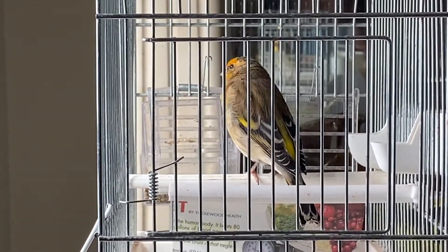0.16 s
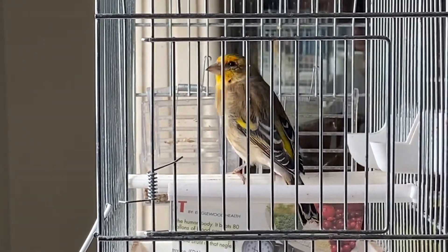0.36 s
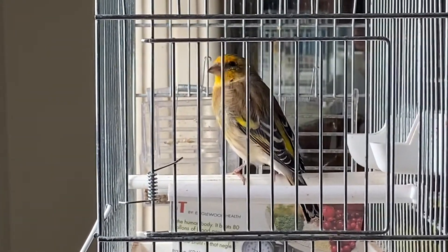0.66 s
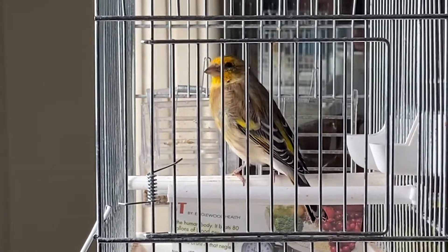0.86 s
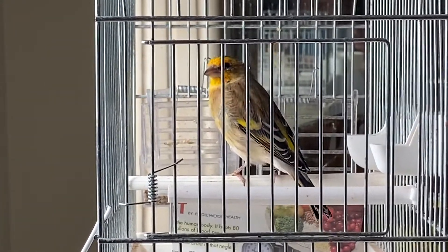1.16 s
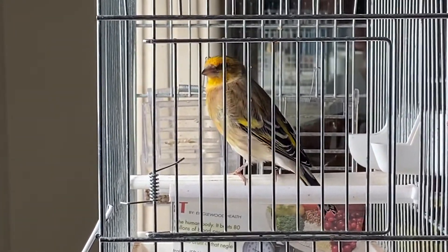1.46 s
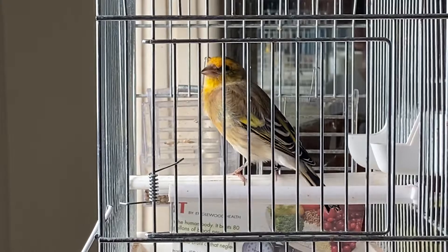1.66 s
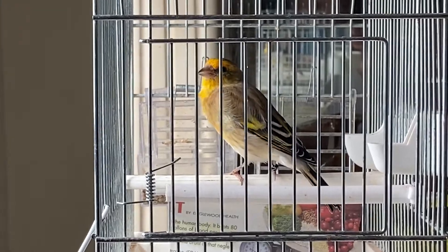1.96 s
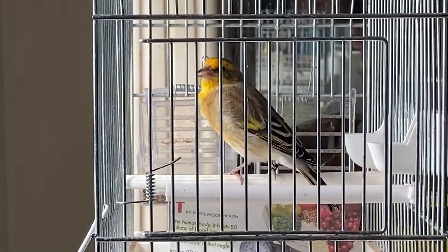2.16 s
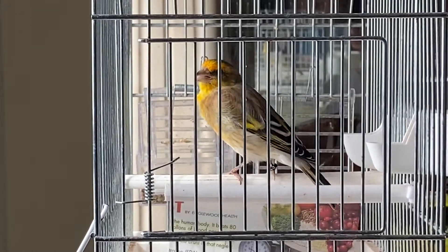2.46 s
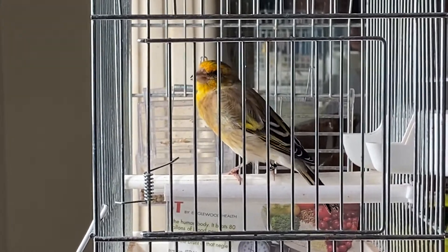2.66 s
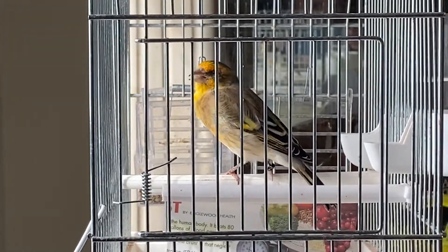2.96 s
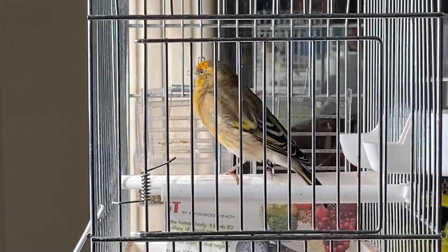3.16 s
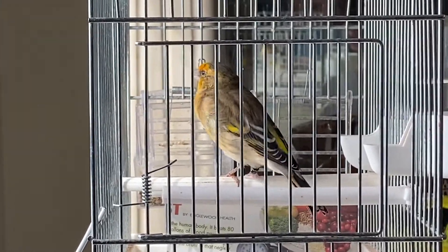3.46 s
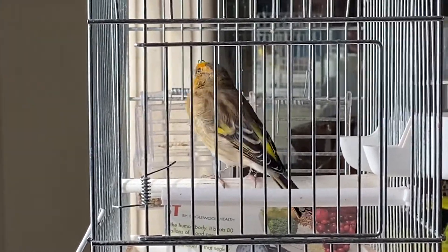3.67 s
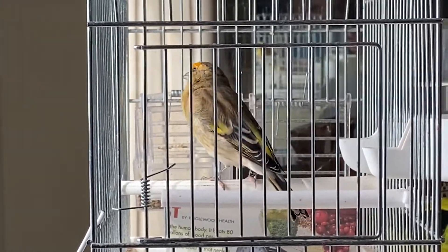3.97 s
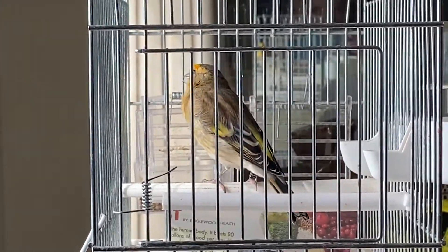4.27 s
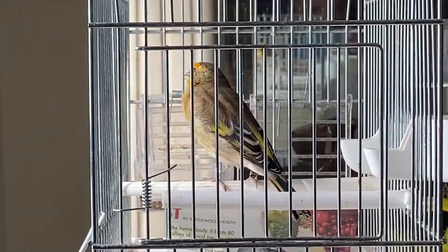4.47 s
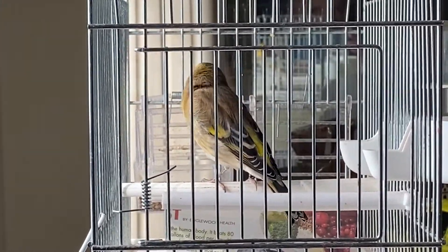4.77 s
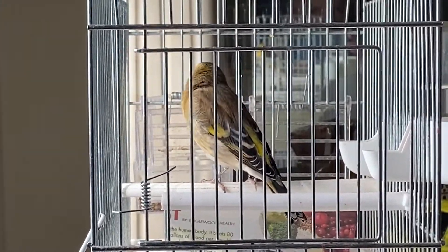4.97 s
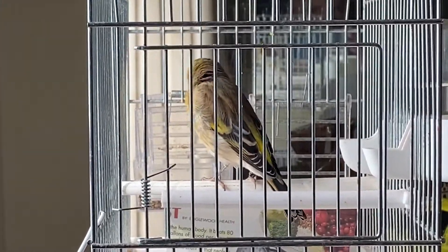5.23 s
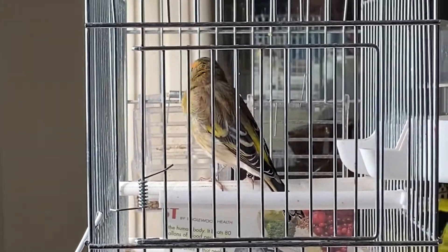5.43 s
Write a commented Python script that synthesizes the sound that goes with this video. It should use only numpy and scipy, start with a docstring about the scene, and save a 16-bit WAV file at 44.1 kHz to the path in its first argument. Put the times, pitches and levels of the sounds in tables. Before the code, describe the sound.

After a quiet second and a half with faint distant bird trills, a nearby finch sings rapid chirps and warbles that ring indoors.

```python
"""A small finch on a perch in a wire cage sings a fast twittering song indoors, close to the microphone.
Both sides of its voice organ, the syrinx, whistle gliding notes with weak overtones and hissing air.
The hard room rings after each note, and late in the song a foot scuffs the perch.
A noise hum of ventilation with a few thin whines lies beneath; before the song, another bird
trills far off as tones of trembling pitch."""
import sys
import numpy as np
from scipy import signal
from scipy.io import wavfile
from scipy.ndimage import uniform_filter1d

SR = 44100
rng = np.random.default_rng(int(sys.argv[2]) if len(sys.argv) > 2 else 0)


def to_linear_factor(level_db):
    """Convert decibel levels (scalar or array-like) to linear amplitude factors."""
    exponent = np.asarray(level_db, float) / 20
    return 10 ** exponent


def dump(signal):
    """Clip the signal to [-1, 1] and save it as 16-bit WAV at the path in sys.argv[1]."""
    limited = np.clip(np.atleast_2d(signal).T, -1, 1)
    pcm = np.round(limited * 32767).astype(np.int16)
    wavfile.write(sys.argv[1], SR, pcm)


N = 246959  # length of the scene in samples

# How the bird holds its head and how rough its voice is:
# (time [s], beak towards the microphone [0-1], rasp [share of the pitch])
FACING = [(3.1, 0.81, 0.0053), (4.5, 0.63, 0.014), (5.3, 0.61, 0.019)]
ALONG = np.linspace(0, 1, 33)  # points along a note, from its start (0) to its end (1)


def evened(x):
    """Scales a sound to an average strength (rms) of 1."""
    return x / np.sqrt(np.mean(x ** 2) + 1e-20)


def read(points, hz):
    """Reads a (frequency, value) table between its rows, on a log-frequency axis."""
    f, value = np.transpose(points)
    return np.interp(np.log(hz + 1), np.log(f + 1), value)


def add(mix, s, sound):
    """Mixes a sound in at time s."""
    part = mix[round(s * SR):][:len(sound)]
    part += sound[:len(part)]


def wobble(size, rate_hz):
    """Smooth random wandering of rms 1: noise with everything much faster than rate_hz removed."""
    settle = 400  # samples thrown away while the filter starts up
    noise = rng.standard_normal(size + settle)
    return evened(signal.lfilter(*signal.butter(N=2, Wn=rate_hz, fs=SR), noise)[settle:])


def hum():
    """Broad ventilation noise in stereo, the deep bass near the middle, with faintly drifting patches."""
    # colour of the noise: (frequency [Hz], relative level per Hz [dB])
    colour = [(18, -52), (30, -5.5), (64, -2), (98, -7.5), (239, -13), (632, -24), (1910, -35),
              (2350, -33.5), (3490, -42), (5450, -46.5), (16000, -69)]
    # how alike left and right are: (frequency [Hz], likeness [-1 to 1])
    likeness = [(60, 1), (240, 0.69), (950, 0.17), (3770, 1), (15000, 0.077)]
    # stereo balance: (frequency [Hz], left over right [dB])
    balance = [(60, 0.5), (200, 4), (1400, -0.5)]
    frames, hz = N // 512 + 5, np.fft.rfftfreq(2048, 1 / SR)
    a, b, c, d, patches = rng.standard_normal((frames, 1025, 5)).T
    patches = uniform_filter1d(patches, size=12, axis=0)  # smooth over frequency
    patches = evened(uniform_filter1d(patches, size=8, axis=1))  # smooth over time
    same = np.clip(read(likeness, hz), -1, 1)[:, None]
    first, second = a + 1j * b, c + 1j * d
    left = first * to_linear_factor(read(balance, hz))[:, None]
    right = same * first + np.sqrt(1 - same ** 2) * second
    spectrum = np.array([left, right]) * to_linear_factor(read(colour, hz)[:, None] + 1.7 * patches)
    noise = signal.istft(spectrum, nperseg=2048, noverlap=1536)[1][:, :N]
    return to_linear_factor(-54.5) * evened(noise)


def whines(steady=1.0):
    """Thin motor and duct whines: each a steady tone inside a narrow band of noise."""
    # one row a whine: (level [dB], reach of the noise either side of the tone [Hz])
    lines = [(-58.5, 21), (-67, 28.5), (-78.5, 11.4), (-82.5, 6.7), (-80.5, 42), (-87, 6.9), (-93, 12)]
    # pitch of each whine, in the same order [Hz]
    line_hz = [59, 230, 590, 1114, 2347, 3230, 5281]
    out = np.zeros(N)
    for hz, (db, width) in zip(line_hz, lines):
        turn = 2 * np.pi * hz * np.arange(N) / SR
        tone = (steady + wobble(N, width)) * np.sin(turn)
        out += to_linear_factor(db) * (tone + wobble(N, width) * np.cos(turn))
    return out


def far_bird():
    """Trills from another room: tones whose pitch trembles fast and at random."""
    # one row a trill: (start [s], pitch [Hz], length [s], level [dB])
    trills = [(0.125, 6300, .16, -87), (0.84, 3950, 0.22, -73.5), (1.006, 5200, 0.19, -75),
              (1.154, 4570, 0.21, -75.5)]
    out = np.zeros(N)
    for s, hz, length, db in trills:
        size = round(length * SR)
        turn = 2 * np.pi * np.cumsum(hz * (1 + 0.085 * wobble(size, 220))) / SR
        add(out, s, to_linear_factor(db) * np.sin(turn) * np.hanning(size))
    return out


def note(rows, fade_s=0.002, flutter_db=3.0, waver=0.004):
    """One side of the syrinx: a gliding near-sine with weak overtones and an unsteady airflow."""
    # overtones of the whistle: (multiple of its pitch, level against the whistle [dB])
    series = [(2, -18.5), (3, -24.5)]
    s, hz, db = np.transpose(rows)
    t = np.arange(s[0] - fade_s, s[-1] + fade_s, 1 / SR)
    rasp = np.interp(t, *np.transpose(FACING)[::2])
    glide_hz = uniform_filter1d(np.interp(t, s, hz), size=60)
    pitch = glide_hz * (1 + waver * wobble(len(t), 220) + rasp * wobble(len(t), 710))
    # "edge" rises over twice fade_s and falls the same way at the end
    edge = np.clip(np.minimum(t - t[0], t[-1] - t) / (2 * fade_s), 0, 1)
    flutter = flutter_db * wobble(len(t), 89)
    level = to_linear_factor(np.interp(t, s, db) + flutter) * np.sin(np.pi / 2 * edge) ** 2
    turn = 2 * np.pi * np.cumsum(pitch) / SR
    # overtones too high for the sample rate are left out
    overtones = sum(to_linear_factor(d) * np.sin(k * turn) * (k * pitch < SR / 2) for k, d in series)
    layers = np.array([np.sqrt(2) * np.sin(turn), np.sqrt(2) * overtones, edge])
    return t[0], (level * layers).T


def glide(start, length, from_hz, to_hz, db, peak):
    """A straight slide in pitch that swells to its peak and fades after it."""
    swell_db, fade_db = -16.5, -14  # level change over a whole note's length, before and after the peak
    shape_db = swell_db * np.maximum(peak - ALONG, 0) + fade_db * np.maximum(ALONG - peak, 0)
    return np.transpose([start + ALONG * length, from_hz + (to_hz - from_hz) * ALONG, db + shape_db])


def chirp(start, length, from_hz, knee_hz, to_hz, db):
    """Pitch relaxes like a released spring, then sags; the note bursts in and is loudest mid-range."""
    # loudness of a chirp by its pitch: (pitch [Hz], level change [dB])
    reach = [(1700, -24.5), (2400, -21.5), (3400, -2.5), (4600, 0), (5600, -3), (7500, -13.5)]
    plunge_s = 0.0035  # time constant of the plunge
    burst_s, burst_db, spent_db = 0.0031, -8.5, -4.5  # onset time and depth; fade by the end
    age = ALONG * length
    sag = (to_hz - knee_hz) * ALONG
    hz = knee_hz + sag + (from_hz - knee_hz) * np.exp(-age / plunge_s)
    onset_db = burst_db * np.clip(1 - age / burst_s, 0, 1)
    return np.transpose([start + age, hz, db + onset_db + spent_db * ALONG + read(reach, hz)])


def throb(start, length, from_hz, to_hz, db, per_s):
    """A sliding whistle blown in quick puffs."""
    dip_db = -16  # depth of the dips between puffs
    shape_db = dip_db * np.cos(np.pi * per_s * ALONG * length) ** 2
    return np.transpose([start + ALONG * length, from_hz + (to_hz - from_hz) * ALONG, db + shape_db])


def finch(square=0.295):
    """All notes; two sounding together mix in the windpipe into sum tones; air hisses with the effort."""
    # warbles that bend up and down, one list a warble: (time [s], pitch [Hz], level [dB])
    warbles = [
        [(1.529, 3050, -37), (1.534, 2985, -42.5), (1.543, 5440, -36), (1.549, 4830, -27), (1.557, 4370, -23.5),
         (1.566, 4776, -23.5), (1.577, 4720, -22)],
        [(1.602, 5380, -22.5), (1.607, 6800, -40.5), (1.618, 6100, -35), (1.626, 5000, -27),
         (1.635, 3870, -20.5), (1.653, 3610, -24)],
        [(1.716, 5000, -27.5), (1.735, 5090, -23.5), (1.742, 5090, -20.5), (1.748, 4420, -20.5),
         (1.756, 5060, -22)],
        [(1.831, 7000, -37), (1.836, 7400, -44), (1.846, 7470, -42.5), (1.861, 5780, -22.5), (1.876, 5650, -24)],
        [(1.949, 4700, -30), (1.97, 4690, -22), (1.979, 4250, -21), (1.982, 4100, -29.5), (1.992, 3574, -15),
         (2.0, 3274, -23.5)],
        [(2.313, 3750, -19.5), (2.328, 3310, -20), (2.345, 2040, -44)],
        [(2.663, 3020, -42), (2.681, 2130, -44.5), (2.691, 2630, -32), (2.698, 2446, -32.5)],
        [(2.726, 5020, -35), (2.738, 3660, -30.5), (2.743, 4440, -32), (2.748, 4470, -48)],
        [(2.853, 4850, -28), (2.859, 4370, -22.5), (2.864, 4860, -21), (2.872, 5100, -21)],
        [(2.941, 7770, -48), (2.95, 4990, -24.5), (2.958, 4680, -18.5), (2.97, 4450, -24), (2.982, 4430, -14.5),
         (2.988, 4330, -39)],
        [(3.406, 7000, -37.5), (3.42, 6220, -29.5), (3.427, 5620, -16), (3.436, 5400, -25.5)],
        [(3.722, 3900, -49), (3.73, 5840, -30.5), (3.742, 5290, -17.5), (3.748, 6050, -38), (3.761, 7180, -27)],
        [(3.846, 2970, -27), (3.852, 3120, -33), (3.861, 4800, -22.5), (3.868, 5050, -28)],
        [(3.96, 2700, -28), (3.971, 3810, -25.5), (3.98, 5130, -22), (3.992, 5190, -47)],
        [(4.068, 3016, -26.5), (4.076, 6750, -37), (4.083, 3860, -24)],
        [(4.239, 4520, -43), (4.243, 5520, -34), (4.254, 7040, -29), (4.261, 7680, -30), (4.265, 6830, -18),
         (4.273, 5120, -23), (4.287, 3680, -35.5)],
        [(4.351, 5660, -28), (4.355, 5640, -20.5), (4.359, 5310, -29), (4.364, 4050, -24.5), (4.376, 6320, -31),
         (4.381, 6500, -30), (4.39, 6100, -17)],
        [(4.404, 4345, -31), (4.412, 4490, -32), (4.418, 4960, -23), (4.426, 5720, -29), (4.434, 5310, -21.5),
         (4.444, 3150, -28), (4.457, 1970, -47)],
        [(4.508, 5230, -24.5), (4.518, 3854, -22), (4.523, 3200, -40)],
        [(4.588, 4150, -24), (4.597, 5270, -35), (4.602, 4500, -46)],
        [(4.613, 5310, -28), (4.638, 4280, -49), (4.648, 4020, -36.5), (4.664, 3560, -32), (4.669, 3400, -56),
         (4.683, 3370, -23), (4.694, 3374, -31), (4.712, 3260, -35)],
        [(4.828, 3300, -42), (4.838, 2950, -42), (4.848, 3200, -36), (4.872, 2500, -41), (4.892, 2534, -29.5)],
        [(4.971, 3720, -36), (4.981, 4146, -24.5), (5.001, 3950, -36)],
        [(5.01, 5110, -28.5), (5.022, 5240, -24.5), (5.027, 5850, -26.5), (5.04, 5080, -41)],
        [(4.99, 2650, -47), (5.03, 2870, -42.5), (5.057, 2807, -41.5), (5.08, 2715, -26), (5.095, 2440, -38),
         (5.122, 2180, -55)],
        [(5.36, 3970, -31), (5.372, 4570, -29), (5.389, 4960, -32), (5.414, 4270, -28)],
        [(5.568, 4770, -35), (5.582, 3800, -21.5), (5.599, 3570, -20.5)],
        [(5.53, 2750, -47.5), (5.544, 4190, -29), (5.551, 4040, -31), (5.569, 4970, -22), (5.577, 5020, -27),
         (5.58, 4200, -44)],
    ]
    # straight whistles: (start [s], length [s], from [Hz], to [Hz], peak level [dB], place of the peak [0-1])
    glides = [ (1.875, .03, 4980, 4732, -18, 0.85), (2.076, 0.0099, 5740, 7350, -31, .9),
              (2.296, 0.012, 3450, 5820, -20, 0.1), (2.337, 0.03, 4260, 4550, -31, 0.73),
              (2.561, 0.0075, 5960, 3450, -22.5, .45), (2.692, 0.017, 5160, 4670, -34, 0.3),
              (2.701, 0.012, 3280, 3380, -28, 0.67), (2.74, 0.0076, 3340, 3620, -27, 0),
              (2.852, 0.0093, 6100, 5000, -20.5, 0.5), (3.169, 0.016, 4004, 3360, -28.5, 0.75),
              (3.273, 0.016, 6180, 6810, -23.5, 1), (3.018, 0.019, 7100, 5180, -20, 0.9),
              (3.416, 0.019, 4590, 4880, -20.5, 0.76), (3.529, 0.022, 6900, 5880, -16.5, 1),
              (3.55, 0.021, 4580, 4700, -25, 0.35), (3.523, 0.0076, 6700, 6860, -26, .55),
              (3.836, 0.0078, 4800, 4550, -29, 0.5), (3.84, 0.017, 4650, 6700, -36.5, 0.56),
              (3.606, 0.01, 7200, 7050, -23, .6), (3.946, 0.0066, 3060, 5250, -26.5, 0),
              (4.152, 0.021, 3860, 4620, -20.5, 0.43), (4.164, 0.033, 6390, 5930, -33.5, 0.07),
              (4.498, 0.0069, 5450, 3333, -17.5, 0.53), (4.815, .008, 3710, 3900, -32, 0.86),
              (4.824, 0.032, 3965, 4270, -24.5, 0.49), (4.897, 0.0082, 2310, 1820, -42.5, 0.7),
              (4.965, 0.023, 3293, 3407, -25, 0.53), (5.003, 0.012, 5600, 5540, -33, 1),
              (5.044, 0.018, 5000, 3520, -31.5, 0.14), (4.082, .009, 3014, 3420, -27.5, 0.86),
              (5.219, 0.047, 2610, 2246, -42, 0.36), (5.227, 0.024, 3390, 3234, -33, 0.8),
              (5.253, 0.029, 4800, 5110, -38.5, 0.7), (5.275, 0.023, 2563, 2194, -37.5, 0),
              (5.319, 0.036, 2667, 1826, -40, 0.26), (5.322, 0.035, 4700, 3730, -31, 0.78),
              (5.361, 0.0063, 3270, 2580, -29, 0), (5.36, .008, 5960, 5230, -30.5, .9),
              (5.4, 0.021, 3120, 2960, -41.5, 0.5), (5.421, .024, 5660, 4875, -19.5, 1),
              (5.229, .026, 5860, 5400, -53, 0.7), (5.276, 0.0061, 4290, 6070, -32.5, 0.7),
              (5.415, 0.0056, 4280, 5830, -39, 0.4), (2.678, 0.013, 3300, 4970, -39, 0), ]
    # chirps, a plunge to a knee and a slower sag:
    # (start [s], length [s], from [Hz], knee [Hz], to [Hz], level before shaping [dB])
    chirps = [ (2.087, 0.036, 7210, 4300, 3013, -20), (2.143, 0.021, 6305, 4190, 2520, -16),
              (2.181, 0.025, 6790, 4090, 2524, -19), (2.221, 0.019, 7090, 3864, 3480, -17.5),
              (2.38, 0.03, 5460, 3506, 2370, -20), (2.427, 0.025, 6310, 3560, 2350, -16.5),
              (2.47, 0.026, 6080, 3450, 2460, -17), (2.514, 0.019, 6510, 4015, 3365, -16),
              (2.567, 0.013, 7000, 5730, 5170, -22.5), (2.737, .009, 7290, 5400, 4110, -16.5),
              (2.794, 0.027, 6395, 3570, 1630, -16), (2.803, 0.021, 6530, 4400, 3560, -24),
              (2.822, 0.013, 4950, 4000, 3600, -29), (2.938, 0.022, 6020, 3220, 2040, -21),
              (3.016, .022, 7030, 5050, 4690, -19.5), (3.016, 0.0082, 8800, 7600, 7140, -17),
              (3.118, 0.023, 6270, 5240, 4260, -21.5), (3.119, .015, 5480, 4240, 3360, -23.5),
              (3.177, 0.016, 7840, 5850, 4720, -18), (3.288, 0.008, 5940, 4840, 3860, -24.5),
              (4.087, 0.027, 6380, 5250, 4810, -29), (5.278, 0.027, 5920, 4460, 3880, -38), ]
    # throbbing whistles: (start [s], length [s], from [Hz], to [Hz], peak level [dB], throbs [per s])
    throbs = [(3.295, 0.016, 5880, 4810, -16, 113), (3.476, .04, 7150, 6210, -15, 70.6),
              (3.613, .045, 7130, 6046, -16, 70.7)]
    # air hissing past the syrinx: (frequency [Hz], level [dB])
    air = [(1500, -55), (6000, -16), (9000, -24), (16000, -26.5)]
    # colour the throat gives to overtones and sum tones: (frequency [Hz], level change [dB])
    throat = [(4000, 19.5), (6800, -6), (8300, -6.5), (11000, -0.5)]
    voice = np.zeros((N + SR // 10, 3))
    song = [chirp(*r) for r in chirps] + [glide(*r) for r in glides] + [throb(*r) for r in throbs] + warbles
    for rows in song:
        add(voice, *note(rows))
    tone, overtones, effort = voice.T
    hz = np.fft.rfftfreq(len(tone), 1 / SR)
    # squaring the tone makes sum tones; the low difference tones are filtered away
    sum_tones = np.fft.rfft(square * tone ** 2) * np.clip((hz - 4500) / 1500, 0, 1)
    mixed = sum_tones + np.fft.rfft(overtones)
    hiss = np.fft.rfft(effort * rng.standard_normal(len(tone))) * to_linear_factor(read(air, hz))
    treble = np.fft.irfft(mixed * to_linear_factor(read(throat, hz)) + hiss, len(tone))
    return tone[:N], treble[:N]


def knock(rise_s=0.011, t60=0.5):
    """A foot scuffs the plastic perch: a short rub of noise through its dull resonances."""
    # resonances of the perch: (frequency [Hz], reach either side [Hz], level [dB])
    resonances = [(449, 47, -56), (599, 22, -56.5), (862, 20, -56), (1210, 60, -72)]
    t, out = np.arange(SR // 8) / SR, np.zeros(N)
    rub = to_linear_factor(-56.5) * wobble(len(t), 1200)
    for hz, width, db in resonances:
        rub += to_linear_factor(db) * wobble(len(t), width) * np.sin(2 * np.pi * hz * t)
    add(out, 5.51, rub * np.minimum(t / rise_s, 1) * to_linear_factor(-60 * t / t60))
    return out


def room(x, start_s=0.0032, early=0.6, early_s=0.25):
    """Diffuse tail, each band dying at its own speed; three tails take turns so that like notes ring unlike."""
    # basic ringing of the room: (frequency [Hz], time to die by 60 dB [s])
    ring = [(1500, 0.5), (5000, 0.41), (12000, 0.27)]
    hz, t, spectrum = signal.stft(rng.standard_normal((3, SR // 2)), SR, nperseg=256)
    decay = to_linear_factor(-60 * t / read(ring, hz)[:, None])
    tails = signal.istft(spectrum * decay, SR, nperseg=256)[1]
    age = np.arange(tails.shape[1]) / SR
    tails *= np.clip(age / start_s - .5, 0, 1) * (1 + early * np.exp(-age / early_s))  # near surfaces answer first
    tails /= np.linalg.norm(tails, axis=1, keepdims=True)
    share = np.sqrt(2 / 3) * np.cos(np.arange(N) / SR * 3.106 + np.arange(3)[:, None] * np.pi / 3)
    return signal.fftconvolve(share * x, tails, axes=1)[:, :N].sum(0)


def echoes(x):
    """The direct sound and a few early reflections, every second one turned upside down."""
    # reflections from the cage tray and near walls: (delay [s], level against the direct sound [dB])
    reflections = [(.0047, -8), (.0083, -20), (.0135, -12)]
    taps = np.zeros(SR // 20)
    taps[0] = 1
    for k, (s, db) in enumerate(reflections):
        taps[round(s * SR)] = (-1) ** k * to_linear_factor(db)
    return signal.oaconvolve(x, taps)[:N]


def scene():
    """Bird and perch in the room over the hum; as the head turns away the direct sound and the treble drop."""
    facing = np.interp(np.arange(N) / SR, *np.transpose(FACING)[:2])
    tone, treble = finch()
    near, far = tone + facing * treble + knock(), far_bird()
    direct = to_linear_factor(2.5) * echoes(facing * near)
    ringing = room(to_linear_factor(-6.0) * near + 1.5 * far)
    return direct + ringing + 0.5 * far + whines() + hum()


def roll_off(x):
    """The treble ends steeply here."""
    return signal.sosfilt(signal.butter(12, 16730, fs=SR, output="sos"), x)


def record(dry):
    """Gain control eases the level under the song, loud peaks round off, and the channels part in phase."""
    power_db = 10 * np.log10(abs(uniform_filter1d((dry ** 2).mean(0), size=2000)) + 1e-12)
    fall = np.arange(N) * 4.1 / SR  # the held loudness falls this many dB a second
    held_db = np.maximum.accumulate(power_db + fall) - fall
    over_db = np.maximum(held_db + 29.5, 0)
    ducked = dry * to_linear_factor(1.58 - 0.11 * uniform_filter1d(over_db, size=2000))
    knee = 0.75  # no peak passes this value
    rounded = knee * np.tanh(ducked / knee)
    padded = N + SR // 10
    hz = np.fft.rfftfreq(padded, 1 / SR)
    # above split_hz the left channel slips half a cycle every turn_hz, in steps
    split_hz, turn_hz = 6810, 2116
    turn = np.pi * np.maximum(hz - split_hz, 0) / turn_hz
    bump = 0.33 * np.exp(-(np.log(hz / 2600 + 1e-9) / 0.58) ** 2)  # a small opposite slip around 2600 Hz
    lag = (turn - 0.3 * np.sin(2 * turn) - bump) / 2
    colour = np.clip(hz / 45, 0, 1) ** 2 * np.clip((16100 - hz) / 300, 0, 1)  # deepest bass and top treble go
    spread = np.fft.rfft(rounded, padded) * colour * np.exp(1j * np.array([-lag, lag]))
    finished = np.fft.irfft(spread, padded)[:, :N]
    return roll_off(finished)


dry = scene()
out = record(dry)
dump(out)
```